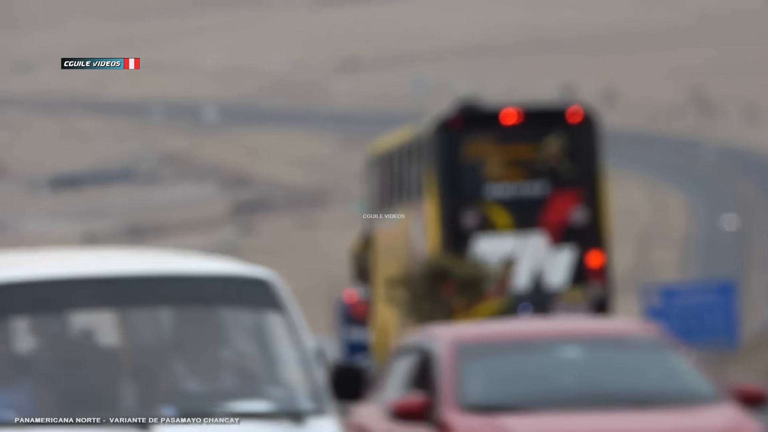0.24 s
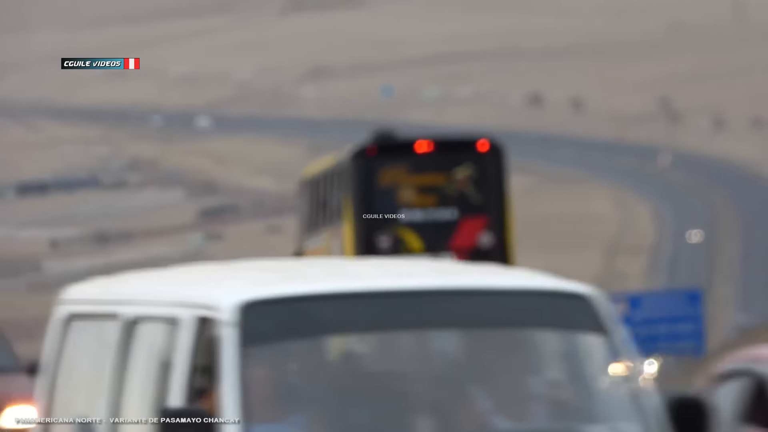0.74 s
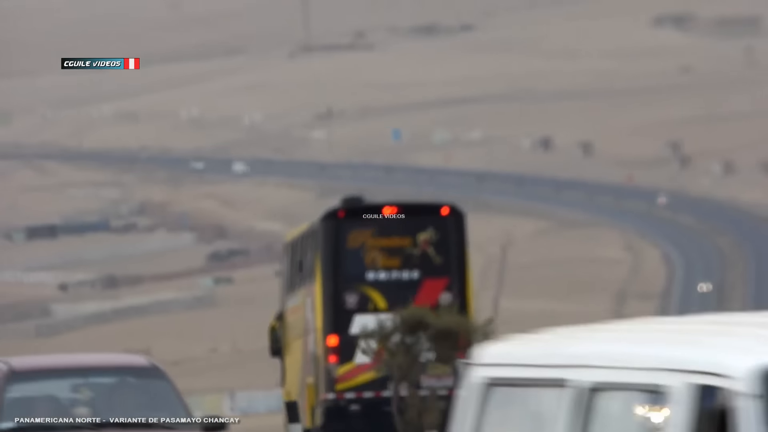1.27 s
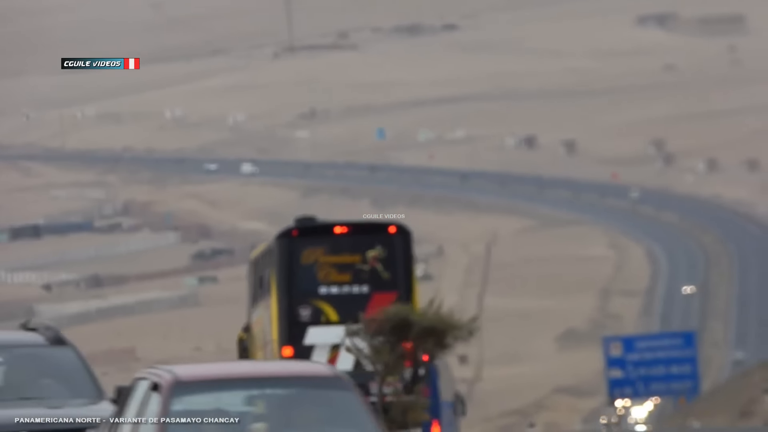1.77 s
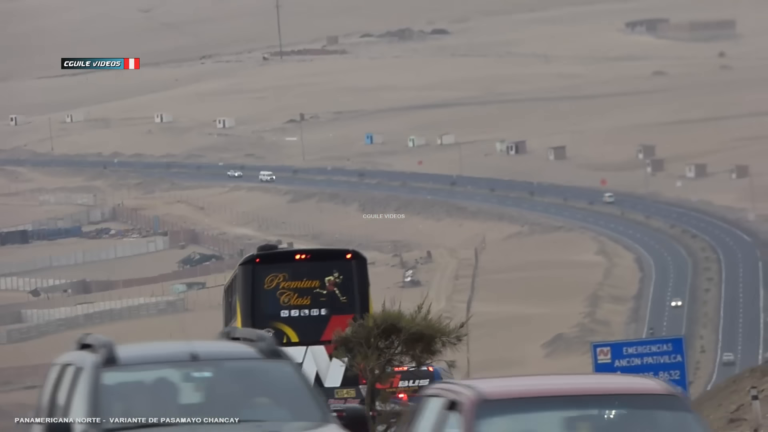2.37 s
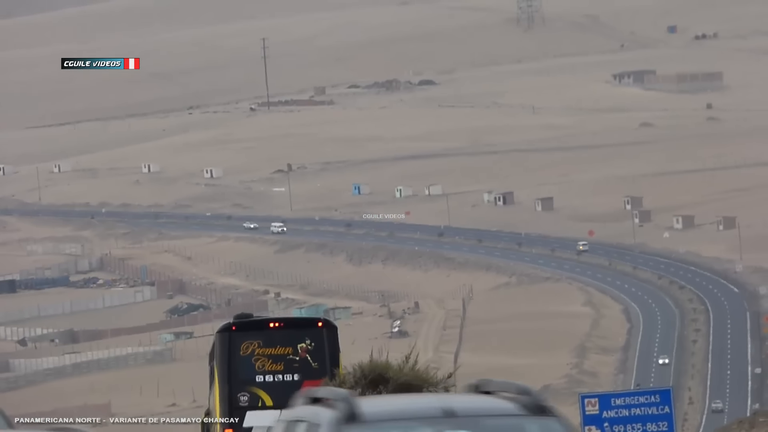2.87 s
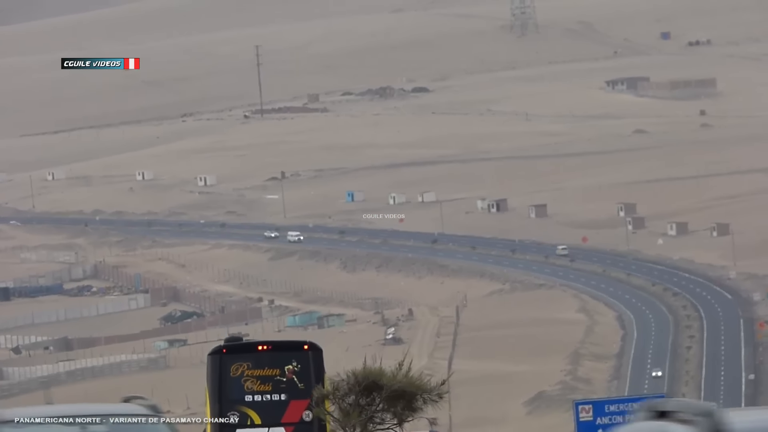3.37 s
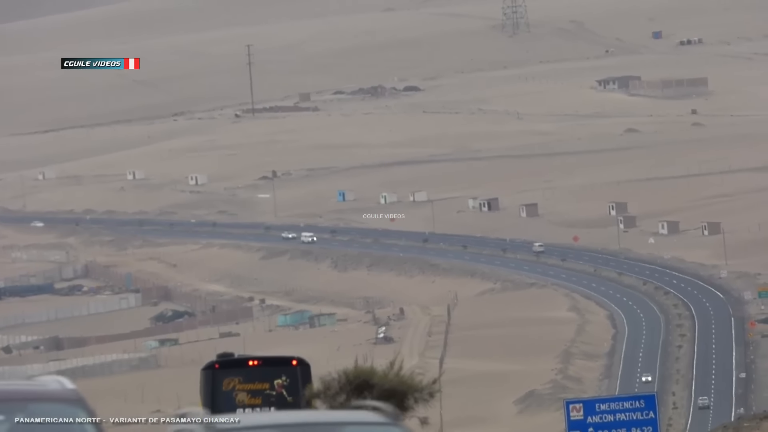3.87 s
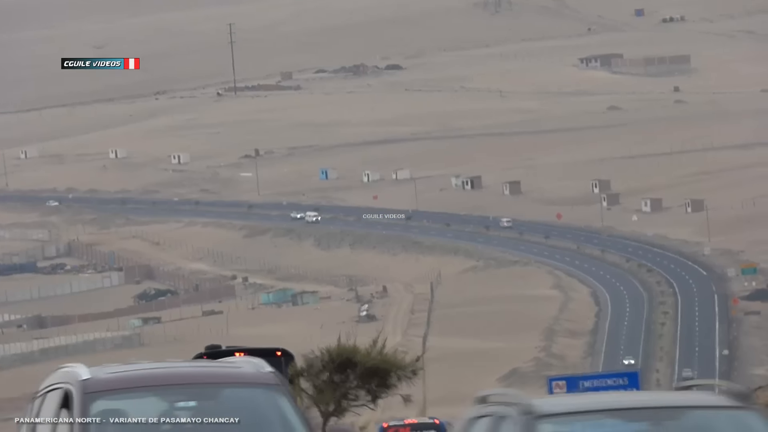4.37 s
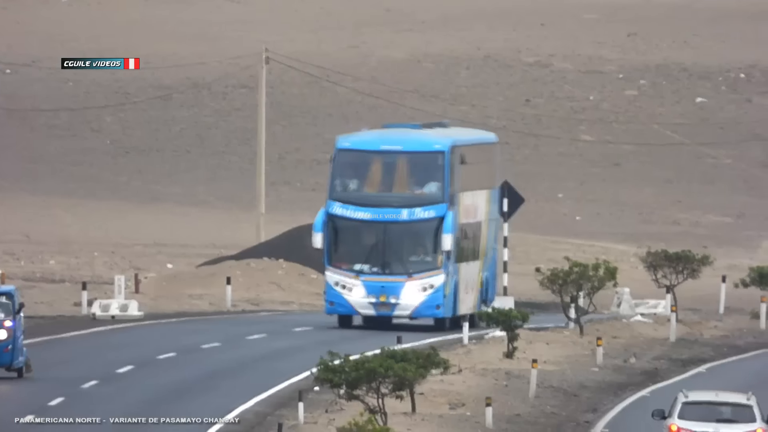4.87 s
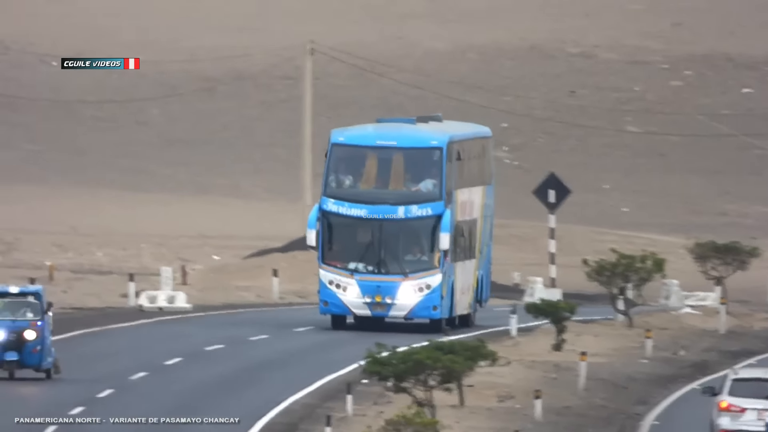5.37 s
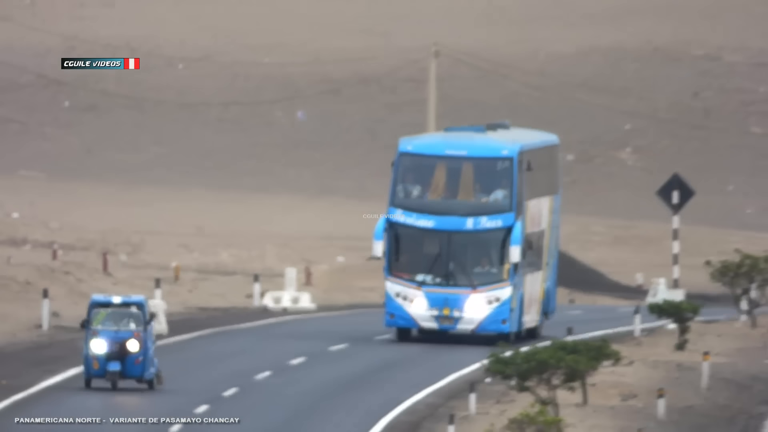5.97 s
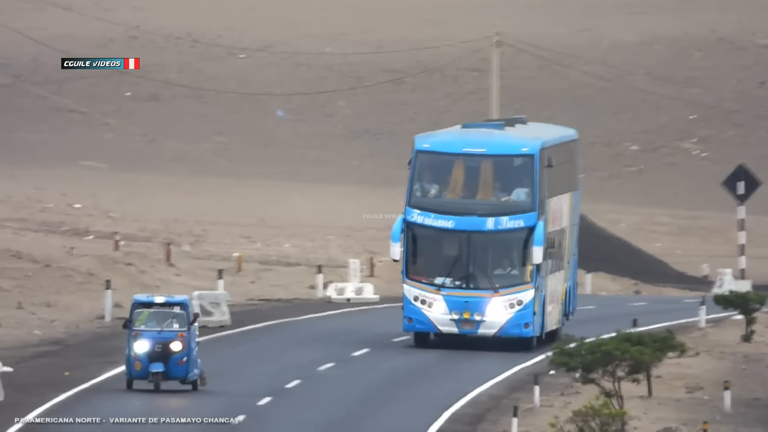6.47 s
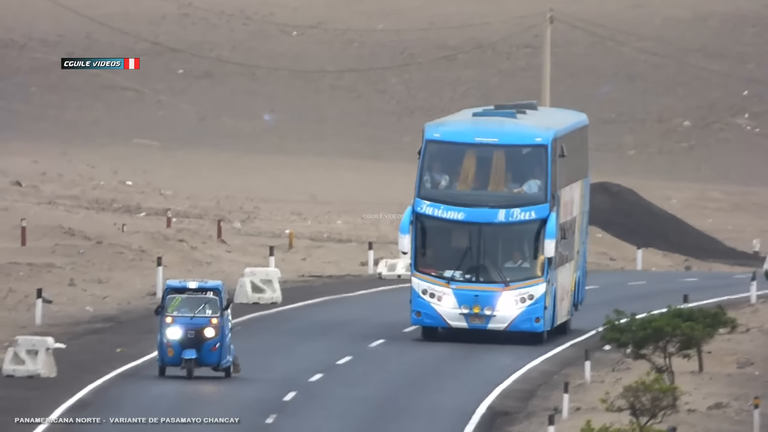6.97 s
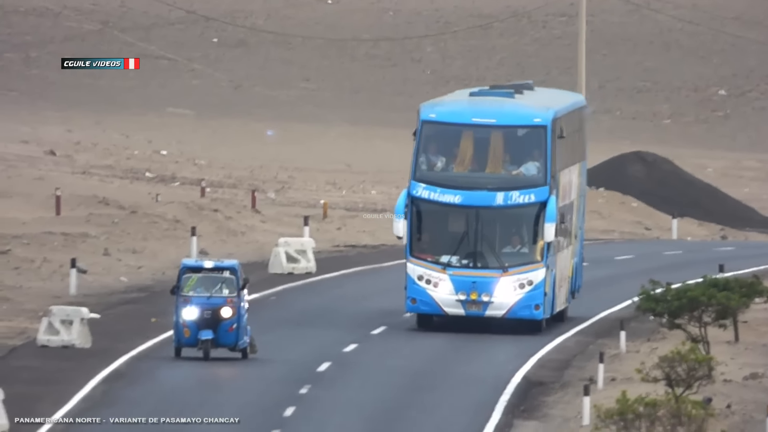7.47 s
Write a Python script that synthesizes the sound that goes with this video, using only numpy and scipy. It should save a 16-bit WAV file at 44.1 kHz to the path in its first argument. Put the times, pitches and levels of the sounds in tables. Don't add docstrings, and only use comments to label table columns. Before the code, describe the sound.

Stereo camera microphone at a dry roadside: near tyre whooshes follow one another about every half second, with sweeping road echoes, humming van and car engines and a few grit snaps. After an abrupt, very short silence, the perspective becomes farther: low coach engine hum swells unevenly, tyres sing softly, a thin gear whine comes and goes, and faint ticks and hiss remain.

```python
import sys
import numpy as np
from scipy import signal
from scipy.fft import rfft, irfft, next_fast_len
from scipy.io import wavfile
from scipy.ndimage import uniform_filter1d

SR = 44100
rng = np.random.default_rng(int(sys.argv[2]) if len(sys.argv) > 2 else 0)


def store_pcm(level_fs):
    pcm = np.round(np.clip(level_fs, -1, 1) * 32767).astype(np.int16)
    wavfile.write(sys.argv[1], SR, np.atleast_2d(pcm).T)


def ratio(d):
    e = np.asarray(d, float) / 20
    return 10 ** e


N = 340893

# start [s], end [s].
SHOTS = [
    (0, 4.829),
    (5.0862, 7.73),
]


def evened(x):
    return x / np.sqrt(np.mean(x ** 2) + 1e-20)


def read(points, hz):
    f, value = np.transpose(points)
    return np.interp(np.log(hz + 1), np.log(f + 1), value)


def columns(rows, t):
    s, *rest = np.transpose(rows)
    return [np.interp(t, s, c) for c in rest]


def drift(rate_hz, size):
    steps = rng.standard_normal(size // 256 + 2)
    hz = np.fft.rfftfreq(len(steps), 256 / SR)
    slow = irfft(rfft(steps) / (1 + (hz / rate_hz) ** 2), len(steps))
    return evened(np.interp(np.arange(size) / 256, np.arange(len(slow)), slow))


def coloured(x, gain_db):
    size = next_fast_len(N)
    gain = ratio(gain_db(np.fft.rfftfreq(size, 1 / SR)))
    return irfft(rfft(x, size) * gain, size)[:, :N]


def sides(left_right_db):
    return ratio(left_right_db * np.array([[.5], [-.5]]))


# frequency [Hz], width [Hz], gain [dB].
SHELL = [(388, 30, -13), (1850, 600, 2), (2600, 400, -2), (3950, 400, 6), (4400, 250, -4), (5000, 500, 3),
         (5900, 400, -2), (6900, 900, 3)]


def shell_db(hz):
    return sum(db / (1 + (2 * (hz - f) / width) ** 2) for f, width, db in SHELL)


def passing_db(t, s, half_s, db, spread):
    return db - 10 * spread * np.log10(1 + ((t - s) / half_s) ** 2)


def summed_db(levels_db):
    return 10 * np.log10(sum(ratio(2 * db) for db in levels_db))


# closest time [s], distance over speed [s],
# exhaust [dB], tyre roar [dB], hiss [dB].
PASSES = [
    [(-.05, 0.32, -27.5, -29.5, -34), (.6, 0.76, -30, -29, -39), (1.2, 0.33, -27, -26, -35.5), (1.65, 0.31, -25, -25, -30.5), (2.05, 0.35, -26, -24, -37), (2.45, 0.34, -25.5, -27, -31), (2.85, 0.22, -25.5, -30, -31), (3.17, 0.2, -24.5, -31.5, -29.5), (3.6, 0.29, -28.5, -26, -31.5), (3.98, 0.35, -31, -36, -32), (4.35, 0.19, -26.5, -29, -34.5), (4.8, 0.27, -23, -23.5, -31.5)],
    [(5.33, 0.37, -28.5, -32, -45.5), (5.95, 0.15, -36, -44, -45.5), (6.4, 0.58, -27.5, -32, -40), (6.92, 0.21, -31.5, -35.5, -42), (7.25, 0.22, -29, -39, -43), (7.6, 0.35, -29, -31.5, -39.5)],
]
SPREAD = 0.97, 1.2, 1.75
RUMBLE_DB = -40.5, -41.5


def road_levels(shot, t):
    levels = [RUMBLE_DB[shot] + 0 * t]
    for k, spread in enumerate(SPREAD):
        passes = [passing_db(t, s, half_s, dbs[k], spread) for s, half_s, *dbs in PASSES[shot]]
        levels.append(summed_db(passes))
    return levels


# closest time [s], distance over speed [s], how long it is heard [s],
# closest comb spacing [Hz], depth [dB].
ECHOES = [
    (0, 5.6, 1.2, 910, 0),
    (1.62, 0.65, 1.3, 1156, 2.5),
    (2.9, 0.78, 1.15, 1284, 2.5),
]


def road_echo(hz, t, teeth=2.13, from_hz=600):
    fade_in_s, fade_out_s = .3, .3
    comb_db = 0
    for s, away_s, length, spacing_hz, db in ECHOES:
        ends = np.minimum(1 + (t - s) / fade_in_s, (s + length - t) / fade_out_s)
        tooth = hz / (spacing_hz * np.hypot(1, (t - s) / away_s))
        comb = np.cos(2 * np.pi * tooth) * np.exp(-(tooth / teeth) ** 2)
        comb_db = comb_db + db * np.clip(ends, 0, 1) * comb
    return ratio(comb_db / (1 + (from_hz / (hz + 1)) ** 4))


# loudest time
# [s], half-width [s], pitch [Hz], glide [octaves/s], level [dB].
TREAD = [(.4, 0.48, 840, 0, 5.5), (0.42, 0.73, 1440, 0, -3.5), (1.25, .3, 1500, 0.14, 3),
         (1.6, 0.23, 3800, .2, 3), (1.7, 0.33, 510, 0.081, 3.5), (2.1, .2, 1450, 0.59, 1),
         (3, 0.19, 4240, 0, 6.5), (3.08, 0.32, 1850, 0.51, -5), (3.28, 0.25, 1500, .5, 3.5),
         (4, 0.23, 2550, .6, 4), (2.91, 0.29, 3000, .3, -6.5), (1.4, .2, 8300, 0.12, 3.5),
         (2.94, 0.2, 8300, 0.64, 5.5), (3.55, .15, 8300, 0, 4), (4.66, .15, 8300, 0, 7),
         (3.4, 3.7, 7030, 0.033, -3.5), (2.34, .3, 2850, 0.75, 6), (4.4, .25, 2700, 0.48, 1.5),
         (3.6, .2, 4500, .4, 5), (3.1, 0.37, 930, 0.031, 2), (0.9, 0.37, 670, 0.15, -5),
         (4.55, 0.17, 530, 0, -4.5), (3.25, 0.25, 550, 0.23, 4), (1.1, .15, 140, 0.12, -5.5),
         (1.55, .12, 80, 0, 7), (3.2, .25, 5560, 0.28, 6.5), (3.9, 0.14, 3340, 1.2, 4),
         (4.3, .4, 1230, 0.051, -3), (4.25, 0.37, 3400, 0, -6.5), (4.1, .3, 6000, 0.33, 5),
         (4.65, 0.29, 860, 0.28, 4), (5.2, 0.12, 2050, 0, 2), (2.8, 0.48, 260, 0.016, -0.5),
         (.65, .35, 2900, 0, -4), (0.79, 0.18, 1000, 0, -2.5), (3.4, 0.23, 5000, .3, -3),
         (4.7, .15, 1150, 0.041, 6), (4.7, 0.19, 274, 0, 4), (.25, .45, 5950, 0, 4), (.9, .5, 5050, 0, -3),
         (4.5, 0.12, 1150, 0, 3), (5.7, 0.9, 763, -0.47, -7.5), (5.5, .3, 2650, 0, -3),
             (5.77, .25, 1370, -0.06, -4), (5.5, 0.15, 1740, .3, 8), (5.57, .2, 290, 0, -6.5),
             (7, .25, 1780, .3, -4), (6.7, 0.37, 3560, 0, 2), (6.75, .15, 90, 0, -5),
             (6.53, 0.38, 1190, -0.086, 4), (6.73, 0.55, 4000, -0.091, 4.5), (6.74, 0.27, 2900, .1, 5),
             (7.08, 0.28, 2560, 0.55, 11), (6.95, 0.27, 6100, 0, 4.5), (7.5, 0.26, 570, 0, 1.5),
             (7.5, .3, 1100, 0, 2.5), (7.47, 0.32, 4170, 0, -6), (7.7, .2, 66, 0, 4.5),
             (7.6, 0.27, 140, 0, 4.5), (6, 0.66, 1510, 0.068, 6.5), (7.7, 0.085, 690, 0, 6.5),
             (7.4, .3, 4000, 0, -3), (6.55, .12, 4050, 0, 2), (6.37, .05, 2900, 0, -4),
             (6.87, .05, 8500, 0, -3), (6.3, .15, 1950, 0, 1), (7.15, .15, 4650, 0, -3),
             (5.65, .12, 6200, 0, -3), (7.2, .1, 90, 0, 5), (5.3, .15, 8100, 0, -3),
             (3.52, .3, 1740, 0.55, 3), (2.6, .15, 2300, 0, -3), (3.75, .1, 5150, 0, -4),
             (2.2, .12, 440, 0, 2.5), (.05, .15, 200, 0, 4), (.05, .15, 550, 0, 1.5), (2.8, .1, 95, 0, 6),
             (3.4, .1, 85, 0, 5), (3.2, .08, 4400, 0, 3), (4.05, .1, 5700, 0, -4),
         (3.4, 0.2, 2570, .7, 8.5), (3.62, .2, 3300, 1, 5), (3.8, .2, 4600, .4, 4),
               (3.4, .09, 4900, 0, -5), (3.75, .14, 4050, 0, -5), (2.2, .12, 1900, 0, -7),
               (3.35, .1, 3750, 0, -4.5), (3.55, .1, 5500, 0, 3), (4.25, .2, 2800, .8, 3),
               (4.35, .25, 7200, 0, -3), (.3, 0.64, 5700, 0, -5.5), (.1, .2, 8900, 0, -6),
               (3.05, .15, 7600, 0, 3), (4.3, .25, 4400, 0, 3), (2.25, .12, 4300, 0, 3.5),
               (1.23, .3, 1120, .2, 3), (4.2, .1, 1000, 0, 2), (.8, .1, 750, 0, 4), (1.2, 0.29, 320, 0, -7),
               (0.77, .3, 210, 0, 2.5), (1.55, 0.081, 270, 0, 4.5), (3.7, .1, 440, 0, -3.5),
               (1.15, .1, 130, 0, -4), (2.9, 0.27, 700, 0, -4), (1.85, .12, 630, 0, -2),
               (6.15, .2, 7000, .5, 4), (6.6, .15, 8400, .3, 3.5), (6.25, .25, 5800, 0, -3),
               (7.4, .3, 6700, .2, 2.5), (7.4, .3, 5400, 0, 1), (7.4, .35, 8400, 0, -1.5),
               (6.85, .15, 1950, 0, -4), (6.5, .3, 4600, 0, 1.5), (5.75, .2, 270, 0, 3.5),
               (7.05, .2, 350, 0, -5), (6.7, .15, 600, 0, -2), (7.45, .07, 240, 0, 3),
               (7.2, 0.11, 160, 0, -2.5), (5.5, .3, 6900, 0, 1.5), (7.45, .3, 3150, 0, -3)]


def tread_db(hz, t):
    total = 0
    for s, half_s, f, glide, db in TREAD:
        if t[0] < s < t[-1]:
            width = 0.11 + 30 / f + .08 * (f > 7400)
            off_pitch = (np.log2((hz + 1) / f) - glide * (t - s)) / width
            total = total + db * np.exp(-((t - s) / half_s) ** 2 - off_pitch ** 2)
    return total


LAYER_HZ = (40, 170, 900, 2800, 15000)
# frequency [Hz], slope-free level [dB per octave].
COLOUR = [
    [(40, -61), (65, -38), (85, -41.5), (120, -28.5), (250, -25.5), (520, -24), (1100, -24), (1700, -20.5), (2150, -23), (2500, -27.5), (3300, -29), (5500, -31.5), (7000, -36), (15000, -46.5)],
    [(45, -81), (100, -30), (230, -24.5), (400, -26), (800, -27.5), (1150, -26.5), (1380, -36.5), (1700, -33.5), (2300, -37), (2600, -44.5), (3300, -44.5), (5500, -47.5), (8000, -55), (15000, -65.5)],
]


def crossovers(hz, overlap=0.44):
    steps = []
    for edge in LAYER_HZ[1:-1]:
        octaves_below = np.log2(edge) - np.log2(hz + 1)
        steps.append(1 / (1 + np.exp(np.clip(octaves_below / overlap * 4, -50, 50))))
    return steps


def road_spectrum(shot, hz, t, above, patchy_db=1.3, gust_db=0.84, brighten=0.25):
    levels_db = road_levels(shot, t)
    shape = ratio(read(COLOUR[shot], hz)) / np.sqrt(hz + 10)
    heard = shape * ratio(shell_db(hz))
    shares = -np.diff([np.ones_like(hz), *above, np.zeros_like(hz)], axis=0)
    power = 0
    for share, db, lo, hi in zip(shares, levels_db, LAYER_HZ, LAYER_HZ[1:]):
        power = power + share * ratio(2 * db) / np.sum(heard[(hz >= lo) & (hz < hi)] ** 2)
    patches = rng.standard_normal((len(hz), len(t)))
    patches = uniform_filter1d(patches, size=3, axis=0)
    patches = evened(uniform_filter1d(patches, size=40, axis=1))
    gusts = evened(uniform_filter1d(rng.standard_normal(len(t)), size=10)) * above[2]
    texture = ratio(patchy_db * patches + gust_db * gusts + tread_db(hz, t))
    size = shape * np.sqrt(power) * road_echo(hz, t) * texture
    octaves_up = np.maximum(np.log2(hz + 1) - np.log2(5000), 0)
    return size * ratio(brighten * octaves_up * (levels_db[-1] - levels_db[-1].mean()))


# frequency [Hz], likeness [0-1].
SAME = [
    [(60, 1), (250, 1), (600, 0.8), (850, 0.99), (1100, 0.21), (1700, 0.99), (2500, 0.71), (3900, 0.91), (5000, 0.69), (6500, 0.4), (10000, 0.12), (15000, 0.36)],
    [(60, 1), (250, 1), (600, 0.96), (800, 0.56), (1150, 0.8), (1400, 0.59), (1900, 0.96), (2550, 0.49), (3800, 0.94), (7000, 0.44), (15000, 0.44)],
]
# frequency [Hz], left leads by [radians].
LEAD = [
    [(60, 0), (350, -.15), (600, -.6), (850, -1.6), (1050, -3.1), (1300, -4.7), (1600, -5.3), (2200, -5.8), (3000, -5.8), (4000, -6.1), (6000, -6.6), (9000, -7.3), (12000, -6.3)],
    [(60, 0), (300, 0), (620, .25), (920, -.15), (1300, .6), (1450, -.1), (1950, .6), (2500, -.7), (4000, -.3), (6000, -.4), (9000, -.1)],
]
# frequency [Hz], left-right [dB].
LEAN = [
    [(200, -0.5), (550, 1), (900, -3.5), (1100, -3), (1450, -8.5), (2000, -3), (2400, -5.5), (4000, -2.5), (8000, -4), (15000, -4.5)],
    [(450, -0.5), (650, 4), (820, 3.5), (1250, -3), (1600, 2.5), (2150, -1.5), (2800, 0), (6000, 0.2), (15000, -1)],
]
# time [s], stretch of the port delay [factor].
BEARING = [(0, .8), (1.0, .8), (2.0, 1.01), (4.0, .99), (4.5, .82), (4.9, .8), (5.0, 1.0), (7.73, 1.0)]
# time [s],
# least likeness [0-1].
FOCUS = [(0, 0), (2.6, 0), (2.9, .6), (4.1, .6), (4.4, 0), (7.73, 0)]
# time [s], left-right [dB].
SIDE_OF = [
    [(0, 0), (1.0, -1.5), (3.0, -4), (4.3, -1.5), (4.83, -3.5)],
    [(5.09, -3.5), (6.0, -3.5), (7.2, 0.5), (7.73, -1.5)],
]


def two_ports(shot, hz, t, size, above):
    stretched = hz * columns(BEARING, t)[0]
    same = np.clip(read(SAME[shot], stretched), 0, 1)
    same = np.maximum(same, columns(FOCUS, t)[0] * (hz < 1500))
    lead = read(LEAD[shot], stretched)
    pan_db = columns(SIDE_OF[shot], t)[0]
    lean = ratio((read(LEAN[shot], hz) + (pan_db - pan_db.mean()) * above[1]) / 2)
    size = size / np.sqrt((lean ** 2 + lean ** -2) / 2)
    a, b, c, d = rng.standard_normal((4, len(hz), len(t)))
    left = a + 1j * b
    right = (same * left + np.sqrt(1 - same ** 2) * (c + 1j * d)) * np.exp(-1j * lead)
    return np.array([left * lean, right / lean]) * size


def traffic(shot):
    t0, t1 = SHOTS[shot]
    t = np.arange(t0 - .05, t1 + .1, 256 / SR)
    hz = np.fft.rfftfreq(1024, 1 / SR)[:, None]
    above = crossovers(hz)
    size = road_spectrum(shot, hz, t, above)
    sound = signal.istft(two_ports(shot, hz, t, size, above), nperseg=1024, noverlap=768)[1]
    out, start = np.zeros((2, N)), round(t0 * SR)
    span = min(round((t1 + .04) * SR), N) - start
    out[:, start:start + span] = sound[:, round(.05 * SR):][:, :span] * np.sqrt(3 / 2)
    return out


def firing(rows, wobble):
    rate_hz = columns(rows, np.arange(N) / SR)[0]
    return np.cumsum(rate_hz * (1 + wobble * drift(6.37, N))) / SR


def engine(booms, shot, turns, flutter_db):
    t = np.arange(N) / SR
    on = (t > SHOTS[1][0] - .1) == shot
    tones = 0
    for k in sorted({round(row[0]) for row in booms}):
        swells = [passing_db(t, *row[1:], 1.82) for row in booms if round(row[0]) == k]
        level = ratio(summed_db(swells) + flutter_db * drift(9.4, N))
        tones = tones + level * np.sin(2 * np.pi * (k * turns + rng.random()))
    return np.sqrt(2) * on * tones


# time [s], rate [Hz].
FIRING = [
    [(0, 107), (1.1, 106), (1.24, 96), (1.8, 95.5), (1.95, 106), (2.3, 106), (3.15, 107), (3.65, 103.5)],
    [(0, 59), (2.5, 58.5), (3.05, 58.7), (3.45, 57.4), (3.85, 58.5), (4.83, 58.5)],
    [(5.09, 49.2), (5.75, 49.6), (6.2, 50.5), (6.85, 50), (7.2, 51.5), (7.73, 51.5)],
]
# multiple of the firing rate, loudest time [s],
# half-width [s], level [dB].
VAN_BOOM = [(1, 0.55, .55, -40), (1, 1.55, 0.25, -39), (1, 2.7, 1, -43), (3, 2.48, 0.13, -26),
            (3, 2.87, 0.18, -23), (3, 3.33, 0.055, -30.5), (3, 3.72, .06, -33.5), (4, 2.27, .2, -30.5),
            (4, 2.6, .08, -27.5), (4, 2.97, 0.22, -30.5), (4, 3.45, .06, -32), (5, 2.25, .12, -33),
            (5, 1.7, .15, -36), (5, 3.1, .1, -35)]
# multiple of the firing rate, loudest time [s], half-width [s], level [dB].
CAR_BOOM = [(1, 2.0, .4, -47), (1, 2.7, .2, -44.5), (1, 4.3, 0.55, -44.5), (2, 3.3, 0.16, -33.5),
            (2, 3.94, 0.24, -31.5), (2, 4.44, 0.33, -31.5), (4, .2, .9, -46), (4, 2.1, 0.2, -39.5),
            (4, 2.45, .05, -31.5), (4, 2.98, 0.2, -29), (4, 3.33, 0.1, -25.5), (4, 4.7, 0.3, -38),
            (5, 0.73, 0.74, -37.5), (5, 3, 0.17, -36), (5, 4.4, 0.23, -34), (8, 2.75, .1, -35),
            (8, 1.9, .15, -38), (10, 3.25, .1, -34)]
# multiple of the firing rate, loudest time [s], half-width [s], level [dB].
COACH_BOOM = [
    (4, 5.65, 0.22, -31),
    (4, 6.65, 0.2, -31.5),
    (4, 5.25, .2, -36.5),
    (4, 6.02, 0.12, -35),
    (5, 5.1, 0.18, -35),
    (5, 6.66, 0.6, -37),
    (5, 7.35, 0.17, -32),
    (5, 8, 0.2, -36),
    (5, 7.73, 0.13, -35),
]
# multiple of the shaft rate, loudest time [s], half-width [s], level [dB].
GEAR_WHINE = [
    (77, 5.5, .45, -58),
    (77, 7.45, .3, -57),
]


def engines(van, car, coach):
    shaft = firing([(0, 49), (7.73, 49.2)], 0.004)
    hum = engine(VAN_BOOM, 0, van, 1.5) + engine(CAR_BOOM, 0, car, 2.2)
    hum = hum + engine(COACH_BOOM, 1, coach, 2.8) + engine(GEAR_WHINE, 1, shaft, 1.2)
    return hum * sides(.6)


# time [s], peak [dB], left-right [dB].
TICKS = [
    (2.9994, -27, -4.5),
    (3.6047, -27, -4),
    (3.6401, -26, -4),
    (4.3066, -32, -3),
    (6.7575, -39, 0),
    (5.2006, -31, -0.5),
    (5.8994, -37, -1.5),
    (6.008, -32, -1.5),
]


def ticks(t60=.008, low_hz=5500, high_hz=10500):
    out, t = np.zeros((2, N)), np.arange(400) / SR
    band = signal.butter(2, [low_hz, high_hz], "band", fs=SR, output="sos")
    for s, db, pan_db in TICKS:
        snap = signal.sosfilt(band, rng.standard_normal(400) * ratio(-60 * t / t60))
        out[:, round(s * SR):][:, :400] += ratio(db) * sides(pan_db) * snap / abs(snap).max()
    return out


CLATTER = 3.61, 0.28, -33.5
# frequency [Hz], gain [dB].
CLATTER_COLOUR = [(1500, -28.5), (2800, 8), (4300, 9.5), (8000, -7.5), (15000, -23.5)]


def clatter(turns, fade=0.23, same=0.24):
    a, b = rng.standard_normal((2, N))
    pair = np.array([a, same * a + np.sqrt(1 - same ** 2) * b])
    puffs = pair * np.exp(-(turns % 1) / fade)
    puffs = evened(coloured(puffs, lambda hz: read(CLATTER_COLOUR, hz)))
    near = np.arange(N) < SHOTS[1][0] * SR
    return puffs * ratio(passing_db(np.arange(N) / SR, *CLATTER, 1.2)) * sides(-3) * near


def scene():
    van, car, coach = [firing(rows, wobble) for rows, wobble in zip(FIRING, (.003, .003, .008))]
    return traffic(0) + traffic(1) + engines(van, car, coach) + ticks() + clatter(car)


# frequency [Hz], gain [dB].
SELF_NOISE = [(2000, -24), (6000, 3), (10000, -10), (15000, -7)]


def self_noise(apart=.4, level_db=-55.5):
    a, b = rng.standard_normal((2, N))
    hiss = np.array([a + apart * b, a - apart * b])
    return ratio(level_db) * evened(coloured(hiss, lambda hz: read(SELF_NOISE, hz)))


# frequency [Hz], share of time kept [0-1].
BASS_SIDE_KEPT = [(40, .06), (130, .16), (215, .35), (300, .45), (390, 1)]


def thinned_bass(x, lift_db=2, band_hz=86):
    hz, t, z = signal.stft((x[0] - x[1]) / 2, SR, nperseg=2048)
    band = (hz // band_hz).astype(int)
    share = read(BASS_SIDE_KEPT, band * band_hz + band_hz / 2)[:, None]
    chance = rng.random((len(t) // 2 + 1, band.max() + 1)).repeat(2, axis=0)
    kept = chance[:len(t), band].T < share
    gain = np.where(share < 1, ratio(lift_db) / np.sqrt(share), 1)
    side = signal.istft(z * kept * gain, SR, nperseg=2048)[1][:N]
    return x.mean(0) + np.array([side, -side])


def microphone_db(hz):
    low_cut = 5 * np.clip((58 - hz) / 10, 0, 1)
    return shell_db(hz) - low_cut - 80 * np.clip((hz - 15700) / 150, 0, 1)


def low_pass(x):
    return signal.sosfilt(signal.butter(12, 16440, fs=SR, output="sos"), x)


def record(dry):
    heard = thinned_bass(coloured(dry + self_noise(), microphone_db))
    t = np.arange(N) / SR
    band = signal.butter(2, [1200, 4300], "band", fs=SR, output="sos")
    ring = signal.sosfilt(band, heard)
    after = np.maximum(t - SHOTS[0][1], 0)
    smear = ratio(-9000 * after) * (after < .01)
    linger = ratio(-2 - 2500 * after) + ratio(-28 - 350 * after)
    linger = linger * np.minimum(after / .001, 1) * (after < .017)
    rise = np.clip((t - SHOTS[1][0]) / .0004, 0, 1)
    offset = -.0025
    return low_pass((heard + offset) * (smear + rise) + ring * linger)


dry = scene()
out = record(dry)
store_pcm(out)
```